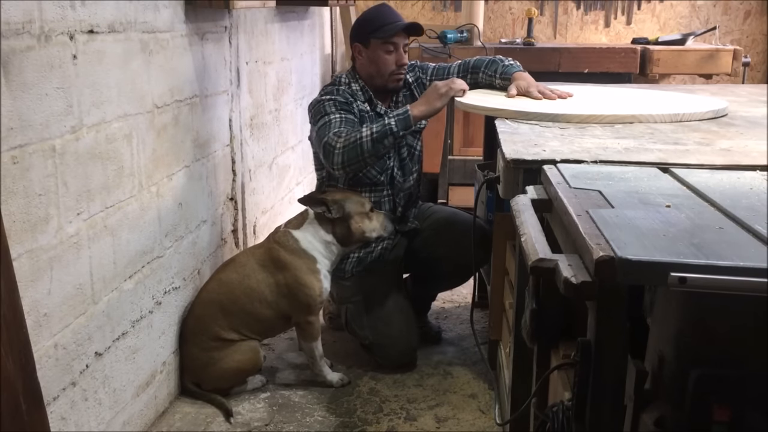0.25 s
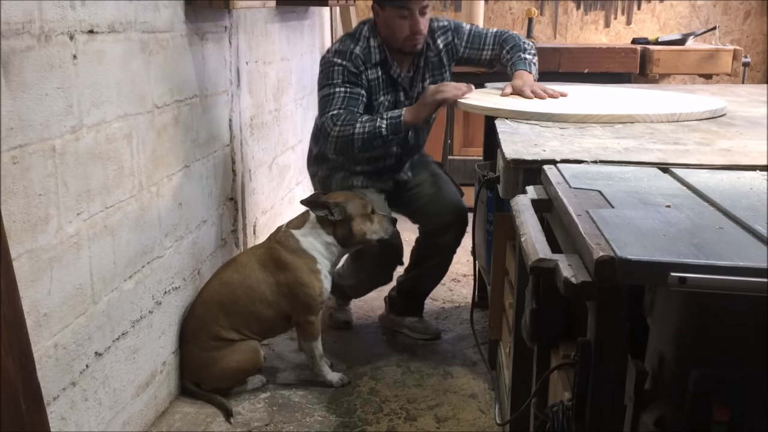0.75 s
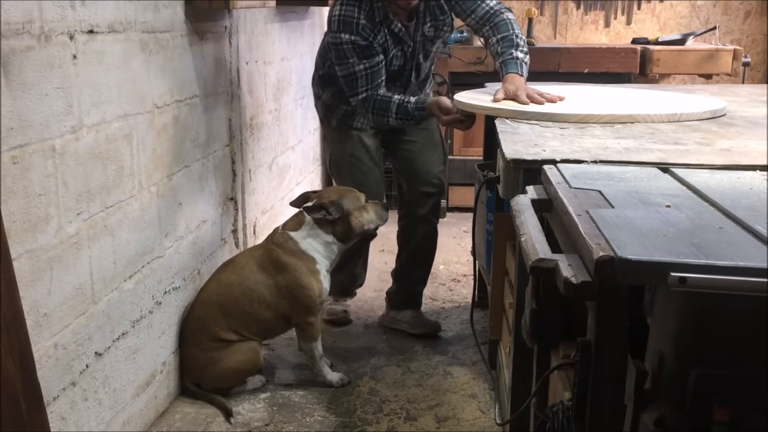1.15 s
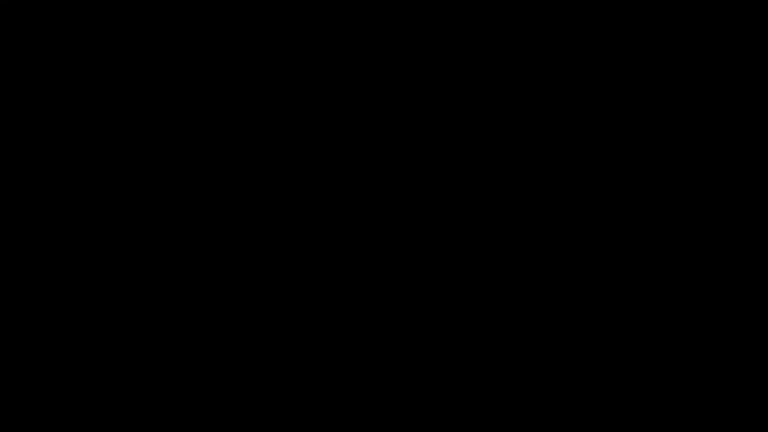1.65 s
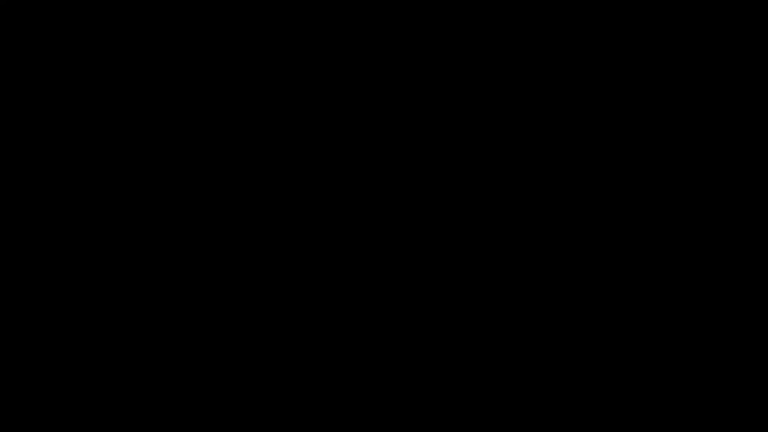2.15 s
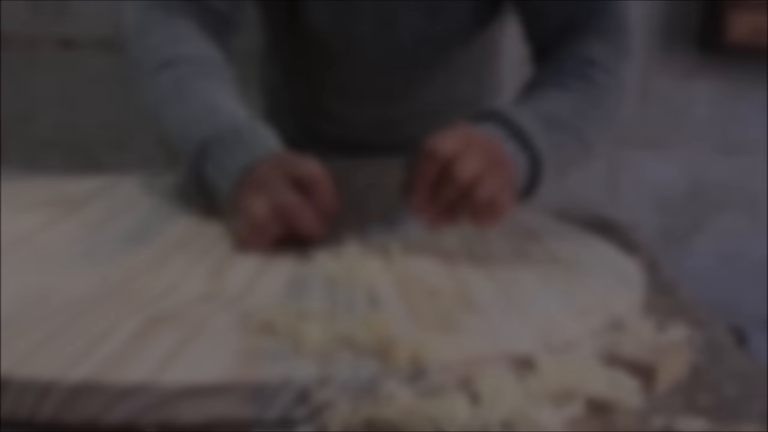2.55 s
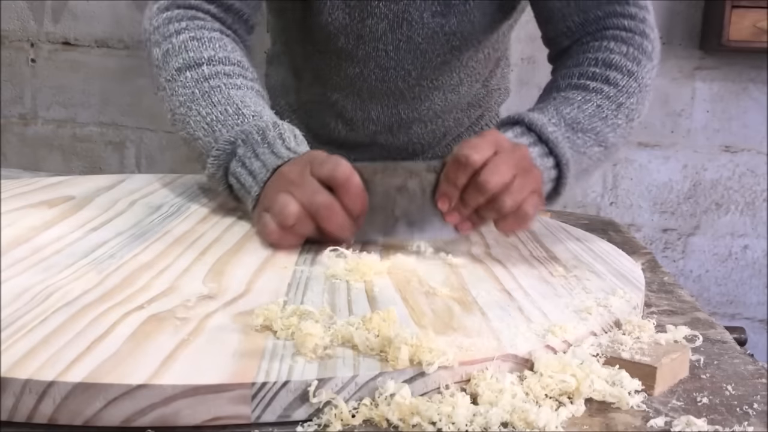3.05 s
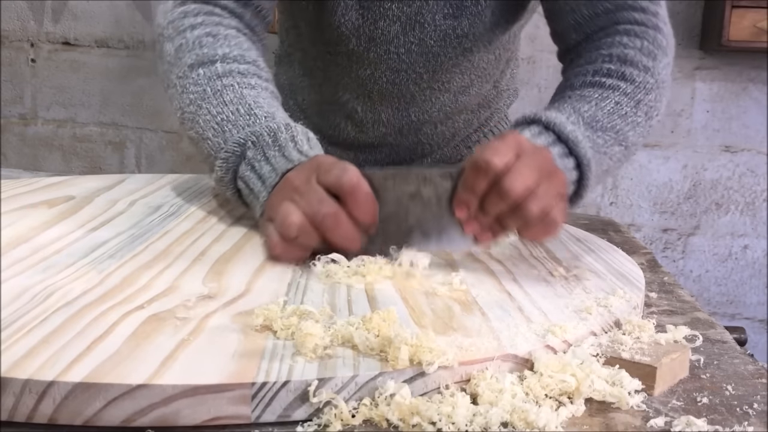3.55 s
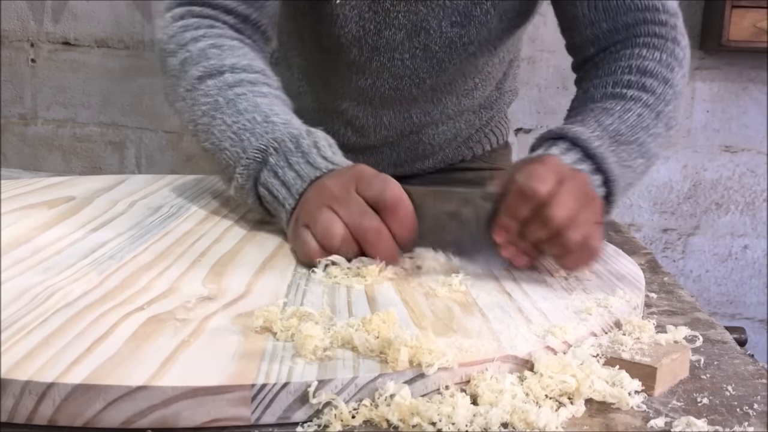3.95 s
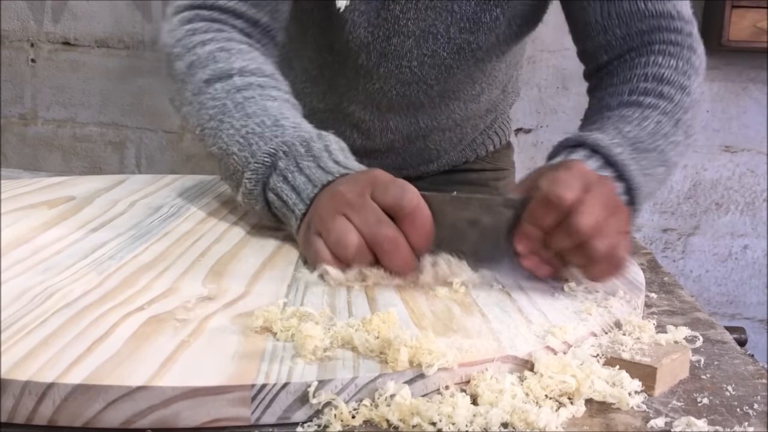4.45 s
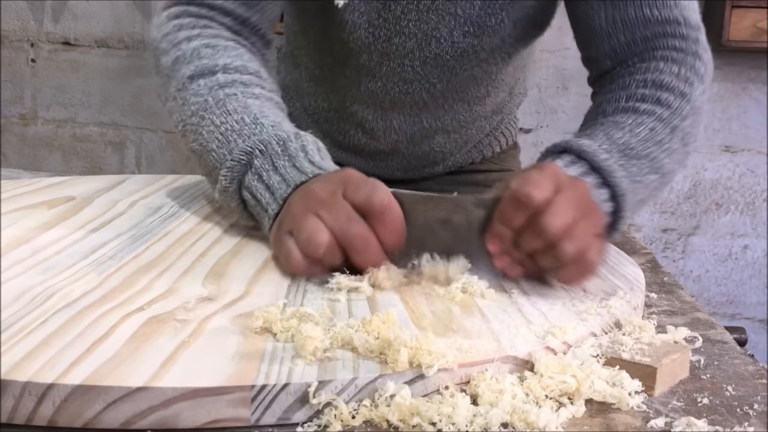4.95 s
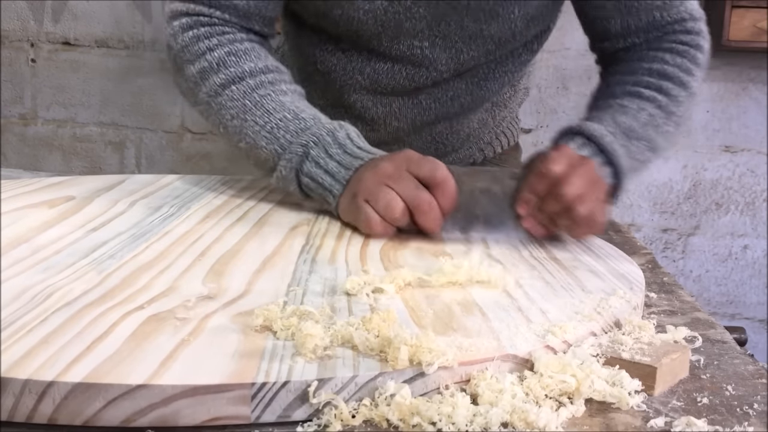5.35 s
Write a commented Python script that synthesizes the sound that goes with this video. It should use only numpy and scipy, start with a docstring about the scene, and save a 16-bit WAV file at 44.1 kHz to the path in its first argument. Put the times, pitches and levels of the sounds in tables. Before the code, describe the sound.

In a small workshop, a metal scraper rubs a wooden top rapidly, dips out briefly, then shaves in slow, strong, rasping strokes.

```python
"""In a small workshop, a steel card scraper works a round wooden tabletop.
Light strokes to and fro come first, with a few dull thuds as the worker stands up; the level then dips briefly.
Eight long pushes follow close by, each after a light drag back and a landing that excites the board's modes.
Snapping fibres, modelled as dense random clicks, are filtered into hiss, rasp and thrum.
The blade chatters in the middle of the last four pushes; a faint hum fades in below."""
import sys
import numpy as np
from scipy import signal
from scipy.fft import rfft, irfft
from scipy.io import wavfile
from scipy.ndimage import uniform_filter1d

SR = 44100
rng = np.random.default_rng(int(sys.argv[2]) if len(sys.argv) > 2 else 0)


def generate_wav(signal):
    """Clip the signal to [-1, 1] and save it as 16-bit WAV at the path in sys.argv[1]."""
    frames = np.transpose(np.atleast_2d(signal))
    scaled = np.clip(frames, -1, 1) * 32767
    pcm = np.round(scaled).astype(np.int16)
    wavfile.write(sys.argv[1], SR, pcm)


N = 246959
T, HZ = np.arange(N) / SR, np.fft.rfftfreq(N, 1 / SR)  # time axis in s, frequency axis in Hz

# Spectrum of the workshop air. Each row: frequency in Hz, relative level in dB.
AIR_COLOUR = [(20, -25), (35, -15), (60, 7), (100, -3.5), (160, 2.5), (475, -15), (2000, -9.5),
              (4500, -22.5), (15000, -24)]
# Decay of the room. Each row: frequency in Hz, time to fall 60 dB in seconds.
ROOM_DECAY = [(150, 0.18), (1000, 0.23), (4000, 0.16), (15000, 0.03)]
# Reflections off the top and the worker. Each row: delay in seconds, level in dB.
NEAR_REFLECTIONS = [(.0019, -29), (.0043, -22), (.0071, -21)]
# The dip in level between the two spells of work: start in seconds, end in seconds.
DIP = (1.487, 1.524)
# Dull thuds. Each row: start in seconds, level in dB, pitch in Hz, scuffing relative to the tone (ratio).
DULL_THUDS = [(0.377, -20.5, 206.6, 0.43), (0.423, -36, 214, 0.45), (.665, -39.5, 681, 0.46),
              (1.161, -40.5, 190, 0.81), (1.179, -39.5, 109, 1.1), (1.236, -50, 127, 0.85),
              (1.296, -44, 131, 0.7)]
# Modes of the tabletop. Each row: frequency in Hz, relative level in dB, time to fall 60 dB in seconds.
BOARD_MODES = [(188, -15, 0.051), (265, -13, 0.21), (422.3, -3, 0.088), (563, -14, 0.14), (586, -18.5, 0.2),
               (670, -4, 0.12), (683, 4, 0.028), (780, 4.5, 0.034), (886, -5.5, 0.11), (977, 4.5, 0.028),
               (993, -16.5, 0.31), (1162, -16, 0.06), (1160, -4.5, 0.12), (1260, -10.5, 0.23),
               (1456, -17.5, 0.28), (1690, -46.5, 0.21), (1900, -6.5, 0.089), (2180, -2, 0.081),
               (2410, -7.5, 0.3)]
# Crowded higher modes of the tabletop. Each row: frequency in Hz, relative level in dB.
BOARD_WASH_COLOUR = [(100, -22), (280, -14), (450, -3), (850, 12), (1900, 5.5), (2600, -1), (4000, 0),
                     (9000, -19.5)]
# Rebounds of a fully bouncing blade. Each row: delay in seconds, level in dB relative to the landing.
BLADE_REBOUNDS = [(0.0049, -2.5), (0.017, -7), (0.0412, -9.5)]
# The edge snags on the grain with a steel tick. Each row: start in seconds, level in dB.
GRAIN_SNAGS = [(3.9467, -37), (4.4144, -23.5), (4.425, -31)]
# Resonances of the hand-held blade. Each row: frequency in Hz, width in Hz, lift in dB before scaling.
BLADE_RESONANCES = [(1420, 160, -4), (2530, 470, 4.5), (3730, 720, 7.5), (5764, 930, 12.5),
                    (6350, 350, 6.5), (8730, 1730, 15), (12120, 1740, 13.5), (14100, 530, 6.5)]
# Spectrum of the drag back. Each row: frequency in Hz, relative level in dB.
DRAG_COLOUR = [(180, -33), (300, -17), (378, -2), (469, -26), (1150, -39), (1990, 2), (2120, -7),
               (2770, -5), (3210, -5), (4480, -2), (5030, -9.5), (6670, 2), (7490, -5.5), (12100, -5),
               (15800, -8.5)]
# Spectrum of the quick strokes. Each row: frequency in Hz, relative level in dB.
QUICK_STROKE_COLOUR = [(180, -62), (300, -10), (360, -15), (527, -13), (622, -8.5), (699, -6.5), (896, -9),
                       (1680, -2), (2720, -0.5), (3860, 1.5), (4790, 0), (8700, -0.5), (10400, -5.5),
                       (14300, -4), (15800, -10.5)]
# Bouts of quick strokes. Each row: list of times in seconds when the hand turns, treble weight (ratio).
QUICK_BOUTS = [([-0.095, 0.047, 0.161, 0.275, 0.405, 0.487, 0.608, 0.716, 0.798, 0.934], 1.43),
               ([1.019, 1.148, 1.283, 1.394, 1.528], 0.61)]
# Effort of the hand through the quick strokes. Each row: time in seconds, level in dB from usual.
HAND_EFFORT = [(0.0, 0), (0.35, 0), (0.65, 1.5), (0.88, -2), (1.05, -4), (1.21, 0.2), (1.34, -1.2),
               (1.47, 1.5)]
# Chatters of the blade. Each row: centre in seconds, level in dB, decay time on either side in seconds.
BLADE_CHATTERS = [(4.051, -12, 0.006), (4.534, -14, 0.017), (5.0382, -6.5, 0.0038), (5.55, -17, 0.011)]
# Spectrum of struck or chattering steel. Each row: frequency in Hz, relative level in dB.
STEEL_COLOUR = [(500, -38), (1300, 21), (2500, 11), (5700, 2), (8500, -4.5), (15800, -14)]
# Long strokes. Each row: landing in seconds, push length in seconds, push level in dB, knock level in dB,
# contact cutoff in Hz, steel tick level in dB, bounce from 0 to 1, drag level in dB.
LONG_STROKES = [(1.7379, 0.3, -22.5, -15, 1860, -32, 0.85, -48.5),
                (2.359, 0.24, -21, -43, 2500, -37, 0.08, -51),
                (2.8593, 0.25, -23.5, -14.5, 1220, -35, 0.19, -46.5),
                (3.3662, 0.27, -22, -25.5, 1019, -49, 0.05, -46.5),
                (3.8424, 0.26, -24, -9, 1700, -12.5, 0.89, -47.5),
                (4.4012, 0.25, -21.5, -31, 2860, -39, 0.01, -47),
                (4.927, 0.24, -20, -37.5, 2600, -67, 0, -46),
                (5.441, 0.19, -17.5, -30, 3600, -25.5, 0, -54.5)]
# Ringing of the blade in the hiss of the pushes. Each row: time in seconds, weight from 0 to 1.
RINGING = [(1.9, 0.51), (3.5, 0.56), (4.5, 0.75), (5.5, 0.26)]
# Spectrum of the hiss through the blade. Each row: frequency in Hz, relative level in dB.
HISS_COLOUR = [(1500, -88), (2800, -14.5), (4500, -5), (7000, -1), (10000, -3), (13000, 1), (15800, 2)]
# Spectrum of the rasp through the board. Each row: frequency in Hz, relative level in dB.
BOARD_RASP_COLOUR = [(200, -9), (480, -8.5), (750, -4), (1050, -1), (1500, 2.5), (2400, -5), (3400, -7.5),
                     (6000, -24.5)]
# Spectrum of the thrumming top. Each row: frequency in Hz, relative level in dB.
TOP_THRUM_COLOUR = [(60, -17), (120, 3), (200, 3.5), (320, -3), (500, -22.5), (1000, -16)]

AIR_DB = -54.5
HUM_HZ, HUM_DB, HUM_FROM_S, HUM_RISE_S = 159.5, -56, 2.8, 1
CUT_HZ = 15900  # upper band edge
THUD_SWELL_S, THUD_SWELL_HZ, THUD_SLOWING = 0.021, 199, 0.54  # lower thuds swell more slowly
TICK_S = 0.0037  # decay time of a steel tick
FIRST_DRAG_S, DRAG_SKEW = 1.57, 1.08  # skew over 1 = fastest late
PAUSE_S = 0.03  # between a push and the next drag
QUICK_DB = -31.5
TURN_SPEED, TURN_POWER, COAST_S = 0.34, 0.65, 0.037  # speed left at a turn, stroke shape, fade around a bout
FASTEST_SHARE, EARLIER_PER_S = 0.73, 0.048  # where a push peaks; it peaks earlier as the work goes on
SETTLE_S, BITE_S = 0.062, 0.018  # delay of a fully bouncing blade, time for the edge to sink in
RASP_DB, THRUM_DB = -33.5, -47
RASP_LAG_S = 0.036  # the board still rasps as the hiss fades


def amp(db):
    """Level law: decibels to amplitude gain."""
    return 10 ** (np.asarray(db) / 20)


def unit(x):
    """Normalisation: scales a signal to rms 1."""
    return x / np.sqrt(np.mean(x ** 2) + 1e-20)


def read(points, hz):
    """Interpolation: reads a table on a logarithmic frequency axis."""
    f, value = np.transpose(points)
    return np.interp(np.log(hz + 1), np.log(f + 1), value)


def add(mix, s, sound):
    """Superposition: adds a sound at time s."""
    part = mix[round(s * SR):][:len(sound)]
    part += sound[:len(part)]


def colour(x, points, ring=0):
    """Linear filtering: a spectrum plus the blade's resonances, their lifts scaled by ring; rms 1."""
    lift_db = sum(db / (1 + (2 * (HZ - hz) / width) ** 2) for hz, width, db in BLADE_RESONANCES)
    gain = amp(read(points, HZ) + ring * lift_db)
    return unit(irfft(rfft(x) * gain, N))


def wander(rate_hz):
    """Random modulation: noise that rolls off above rate_hz; rms 1."""
    spectrum = rfft(rng.standard_normal(N))
    return unit(irfft(spectrum / (1 + (HZ / rate_hz) ** 4), N))


def fibres(per_s, spread_db):
    """Shot noise: wood fibres snap under the edge in dense clicks of uneven size."""
    size = amp(spread_db * np.minimum(rng.exponential(1, N), 5))
    return unit(size * rng.standard_normal(N) * (rng.random(N) < per_s / SR))


def shimmer(x, depth_db):
    """Moving contact: the point of contact wanders along the edge, so narrow bands come and go."""
    z = signal.stft(x, nperseg=512, noverlap=384)[2]
    patches = rng.standard_normal(z.T.shape)
    patches = uniform_filter1d(patches, size=12, axis=0)  # smooth in time
    patches = uniform_filter1d(patches, size=4, axis=1)  # smooth in frequency
    gain = amp(depth_db * unit(patches).T)
    return unit(signal.istft(z * gain, nperseg=512, noverlap=384)[1][:N])


def arch(start, fastest, end, depth_db, flatness):
    """Stroke envelope: level in dB of a stroke that gathers speed, holds it and is braked."""
    rising, falling = (fastest - T) / (fastest - start), (T - fastest) / (end - fastest)
    u = np.where(T < fastest, rising, falling)
    return -depth_db * np.minimum(u, 3) ** flatness


def background():
    """Stationary noise and frequency modulation: still workshop air and a faint wavering hum."""
    air = amp(AIR_DB) * colour(rng.standard_normal(N), AIR_COLOUR)
    hum_hz = HUM_HZ + 2.55 * wander(rate_hz=7.8)
    hum = np.sin(2 * np.pi * np.cumsum(hum_hz) / SR)
    fade_in = np.clip((T - HUM_FROM_S) / HUM_RISE_S, 0, 1)
    return air + amp(HUM_DB) * hum * fade_in


def room(x):
    """Reverberation: sparse reflections off the block walls decay, the treble soonest."""
    half = SR // 2
    taps = rng.choice([-1., 1.], half) * (rng.random(half) < 2500 / SR) * (T[:half] > .003)
    hz, t, z = signal.stft(taps, SR, nperseg=256)
    decay = amp(-60 * t / read(ROOM_DECAY, hz)[:, None])
    tail = signal.istft(z * decay, SR, nperseg=256)[1]
    return signal.fftconvolve(x, tail / np.linalg.norm(tail))[:N]


def thuds():
    """Damped impact: padded bumps swell and die in a few low cycles, with scuffing around their pitch."""
    t, out = T[:SR // 4], np.zeros(N)
    for s, db, hz, share in DULL_THUDS:
        band = signal.butter(3, [.8 * hz, 1.9 * hz], "bandpass", fs=SR, output="sos")
        scuff = unit(signal.sosfilt(band, rng.standard_normal(SR)))[-len(t):]
        swell = THUD_SWELL_S * max(THUD_SWELL_HZ / hz, 1) ** THUD_SLOWING
        shape = (t / swell) ** 2 * np.exp(1 - (t / swell) ** 2)
        add(out, s, amp(db) * shape * (np.sin(2 * np.pi * hz * t) + share * scuff))
    return out


def landings():
    """Modal excitation: landings and rebounds ring the board, softer contact dulls it; the steel ticks."""
    t, out, ticking = T[:SR // 2], np.zeros(N), np.zeros(N)
    modes = np.zeros(len(t))
    for k, (hz, db, t60) in enumerate(BOARD_MODES):
        modes += (-1) ** k * amp(db - 60 * t / t60) * np.sin(2 * np.pi * hz * t)
    wash = colour(rng.standard_normal(N), BOARD_WASH_COLOUR)
    steel = colour(rng.standard_normal(N), STEEL_COLOUR, ring=0.64)
    dull = signal.lfilter(*signal.butter(2, 1200, fs=SR), wash)
    tick = np.exp(-t / TICK_S)
    for lands, _, _, knock_db, sharp_hz, tick_db, bounce, _ in LONG_STROKES:
        contact = signal.butter(3, min(sharp_hz, SR / 4), fs=SR)
        blows = [(lands, 1)] + [(lands + delay, bounce * amp(db)) for delay, db in BLADE_REBOUNDS]
        for s, force in blows:
            here = (round(s * SR) + np.arange(len(t))) % N
            crack = amp(-60 * t / 0.055) * wash[here]  # the high modes die first
            lower = amp(-18.0 - 60 * t / 0.29) * dull[here]
            board = amp(-2) * modes + crack + lower
            add(out, s, force * amp(knock_db) * signal.lfilter(*contact, board))
            add(ticking, s, force * amp(tick_db) * tick)
    for s, db in GRAIN_SNAGS:
        add(ticking, s, amp(db) * tick)
    # a board radiates little deep bass
    return signal.lfilter(*signal.butter(2, 110, "highpass", fs=SR), out + ticking * steel)


def returns():
    """Light friction: the unloaded blade skims back through the shavings, fastest near mid stroke."""
    speed, start = np.zeros(N), FIRST_DRAG_S
    for lands, length, _, _, _, _, bounce, drag_db in LONG_STROKES:
        progress = np.clip((T - start) / (lands - start), 0, 1)
        speed += amp(drag_db) * abs(np.sin(np.pi * progress ** DRAG_SKEW)) ** 0.87
        start = lands + bounce * SETTLE_S + length + PAUSE_S
    skim = colour(fibres(per_s=6300, spread_db=-6.0), DRAG_COLOUR)
    return speed * skim * amp(0.68 * wander(rate_hz=60))


def quick_strokes():
    """Speed-dependent friction: light rubbing swells and sinks with each turn, brighter when faster."""
    unevenness = amp(.6 * wander(rate_hz=45))
    snaps = colour(fibres(per_s=26000, spread_db=-1.5), QUICK_STROKE_COLOUR)
    rub = shimmer(snaps, depth_db=1.5) * unevenness
    body = signal.lfilter(*signal.butter(1, 4500, fs=SR), rub)
    treble = rub - body
    effort, out = amp(np.interp(T, *np.transpose(HAND_EFFORT))), np.zeros(N)
    for turns, brightness in QUICK_BOUTS:
        stroke_phase = np.interp(T, turns, np.arange(len(turns)))
        swing = abs(np.sin(np.pi * stroke_phase)) ** TURN_POWER
        outside_s = abs(T - np.clip(T, turns[0], turns[-1]))
        speed = effort * (TURN_SPEED + (1 - TURN_SPEED) * swing) * np.exp(-outside_s / COAST_S)
        out += speed * (body + brightness * speed * treble)
    return amp(QUICK_DB) * out


def chatters():
    """Stick and slip: at full pressure the blade shrieks for an instant, as bursts of resonant clicks."""
    swell = sum(amp(db) * np.exp(-abs(T - s) / decay) for s, db, decay in BLADE_CHATTERS)
    slips = fibres(per_s=15000, spread_db=-0.7) * amp(1.1 * wander(rate_hz=300))
    return swell * colour(slips, STEEL_COLOUR, ring=1.61)


def pushes():
    """Shared excitation: the same snaps hiss through the blade, rasp through the board and thrum the top."""
    unevenness = amp(.45 * wander(rate_hz=60) + .6 * wander(rate_hz=600))
    snaps = fibres(per_s=18000, spread_db=-0.9) * unevenness
    ringing = np.interp(T, *np.transpose(RINGING))
    plain, resonant = colour(snaps, HISS_COLOUR), colour(snaps, HISS_COLOUR, ring=1.0)
    hiss = shimmer((1 - ringing) * plain + ringing * resonant, depth_db=4.0)
    grain = amp(1.1 * wander(rate_hz=44))
    rasp = shimmer(colour(snaps, BOARD_RASP_COLOUR, ring=0.65), depth_db=5.0) * grain
    growth_rings = amp(3 * wander(rate_hz=25))  # hard and soft rings pass under the edge
    thrum = colour(snaps, TOP_THRUM_COLOUR) * growth_rings
    through_board = amp(RASP_DB) * rasp + amp(THRUM_DB) * thrum
    out = np.zeros(N)
    for lands, length, push_db, _, _, _, bounce, _ in LONG_STROKES:
        start = lands + bounce * SETTLE_S
        share = np.clip(FASTEST_SHARE - EARLIER_PER_S * (lands - LONG_STROKES[0][0]), .1, .9)
        fastest, end = start + share * length, start + length
        touching = np.clip((T - start) / BITE_S, 0, 1)
        hiss_db = arch(start, fastest, end, depth_db=25, flatness=3.3)
        board_db = arch(start, fastest, end + RASP_LAG_S, depth_db=14.5, flatness=4.05)
        out += touching * (amp(push_db + hiss_db) * hiss + amp(board_db) * through_board)
    return out


def scene():
    """Superposition: scraping, knocks, reflections and air, with one brief dip in level."""
    scraping = quick_strokes() + pushes() + returns() + chatters()
    knocks = landings() + thuds()
    reflected = sum(amp(db) * np.pad(scraping, (round(s * SR), 0))[:N] for s, db in NEAR_REFLECTIONS)
    scraping = scraping + reflected
    reverberant = room(amp(-12.0) * scraping + amp(-10.0) * knocks)
    mix = scraping + knocks + reverberant + background()
    sounding = uniform_filter1d(1. * ((T < DIP[0]) | (T > DIP[1])), size=130)
    return (mix * np.maximum(sounding, amp(-34)))[None]


def record(dry):
    """Band limitation: clips at full scale, then removes what lies above the band edge."""
    lowpass = signal.firwin(511, CUT_HZ, window=("kaiser", 9), fs=SR)
    return signal.oaconvolve(np.clip(dry, -1, 1), lowpass[None], "same")


dry = scene()
out = record(dry)
generate_wav(out)
```